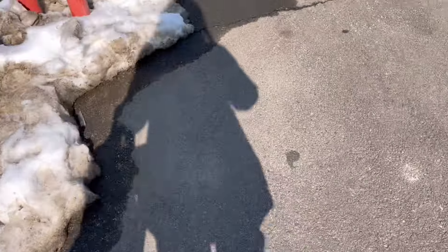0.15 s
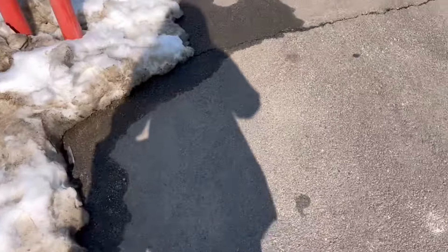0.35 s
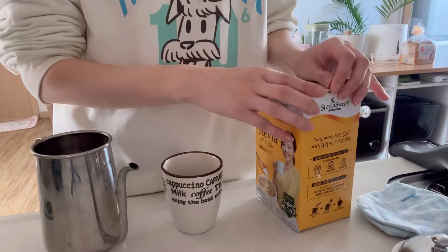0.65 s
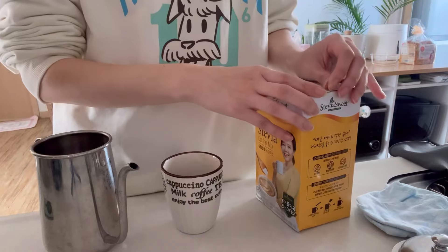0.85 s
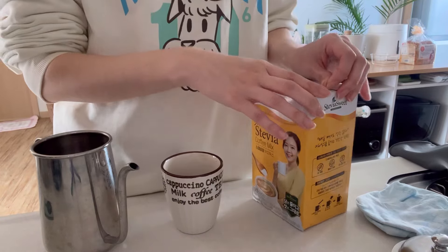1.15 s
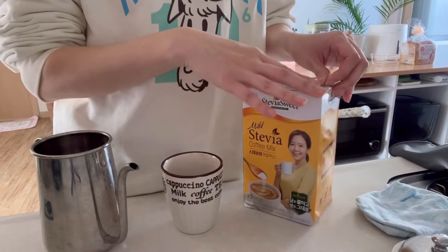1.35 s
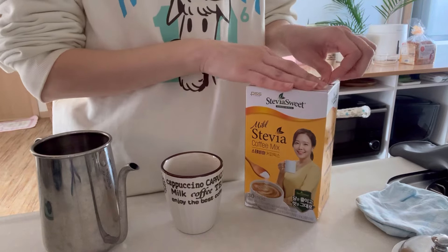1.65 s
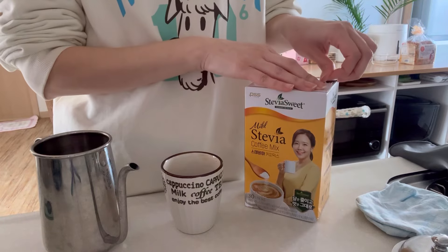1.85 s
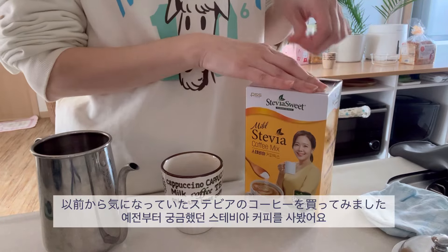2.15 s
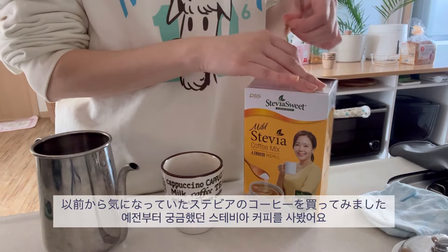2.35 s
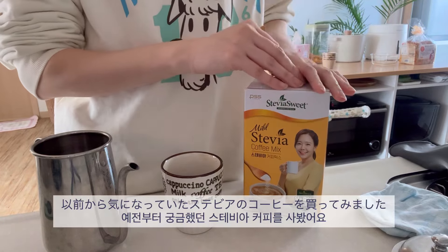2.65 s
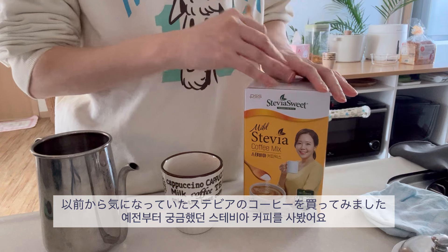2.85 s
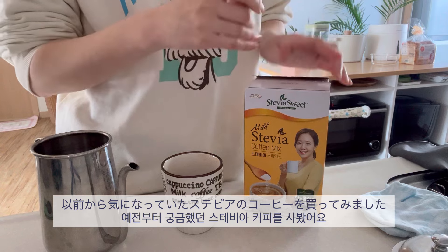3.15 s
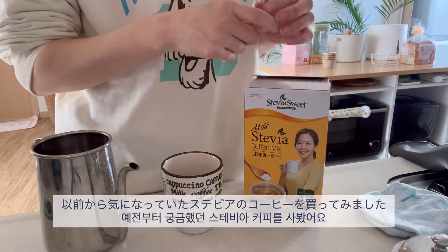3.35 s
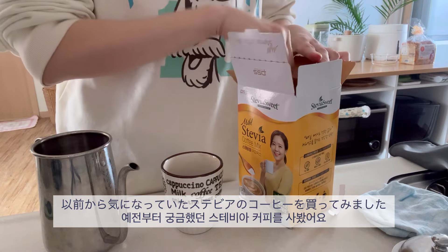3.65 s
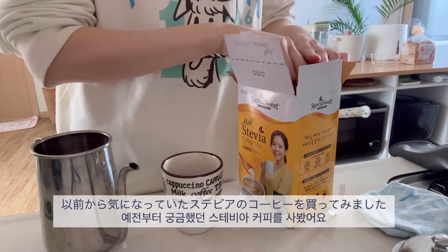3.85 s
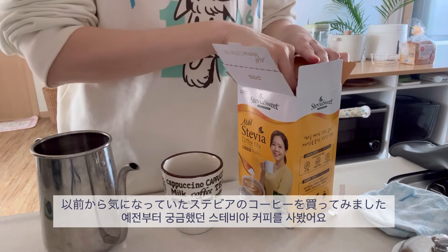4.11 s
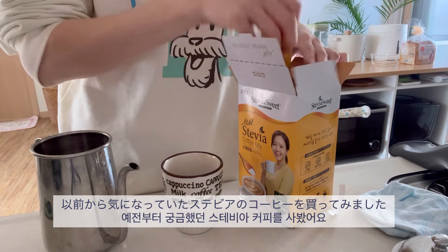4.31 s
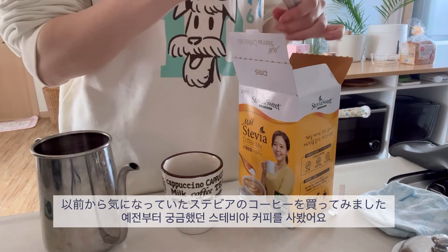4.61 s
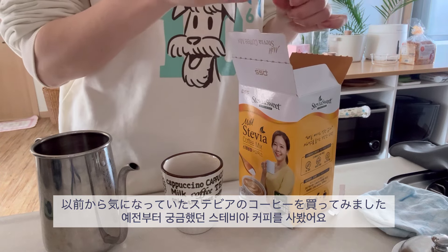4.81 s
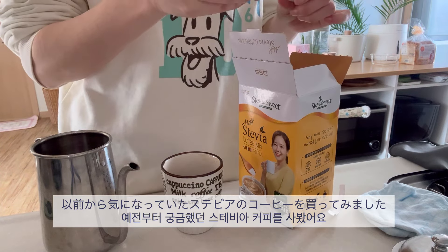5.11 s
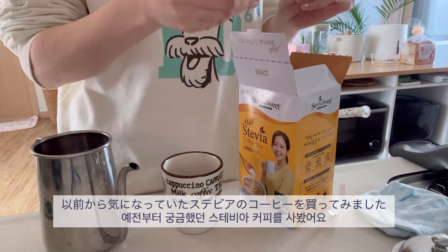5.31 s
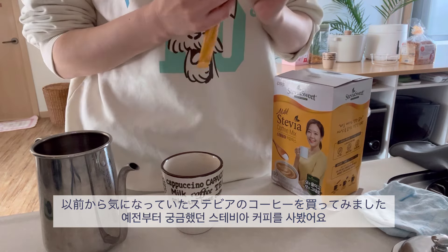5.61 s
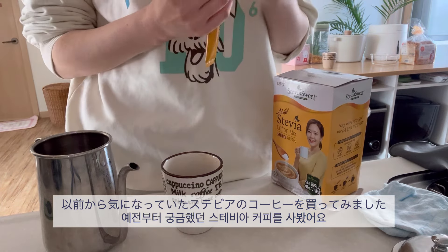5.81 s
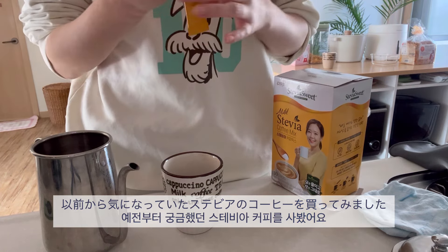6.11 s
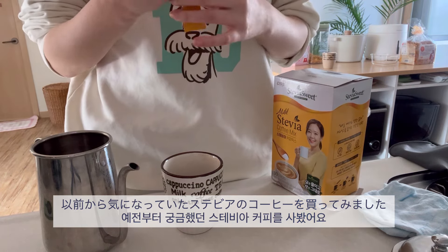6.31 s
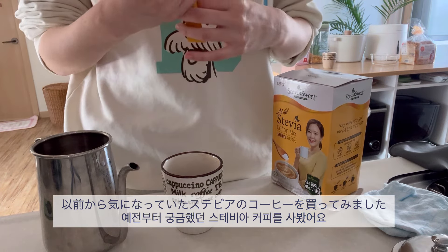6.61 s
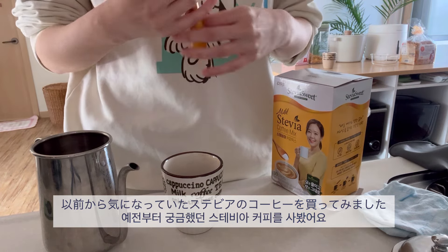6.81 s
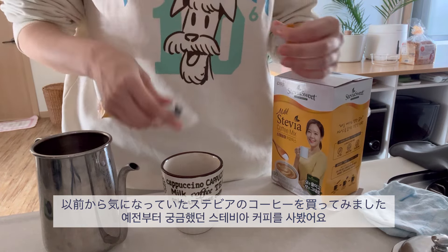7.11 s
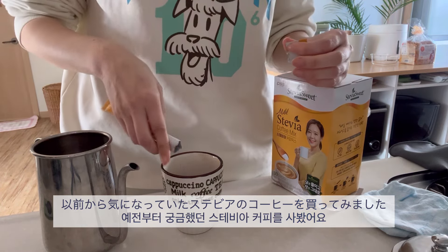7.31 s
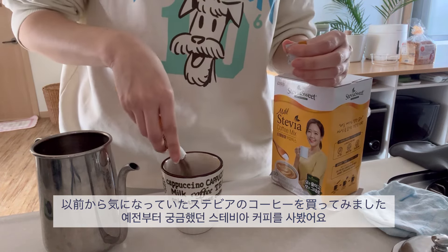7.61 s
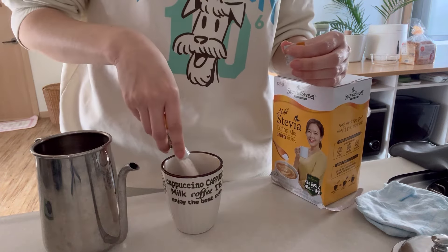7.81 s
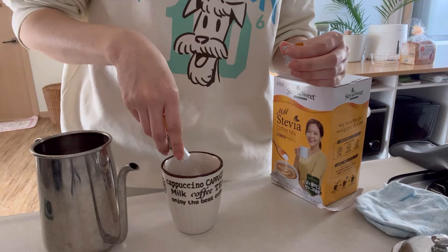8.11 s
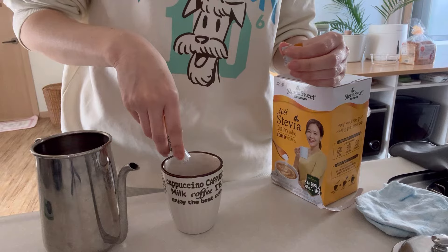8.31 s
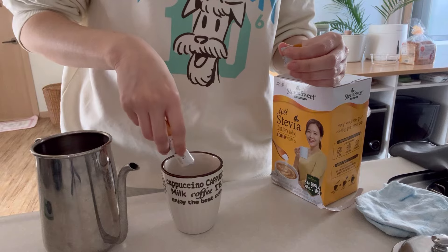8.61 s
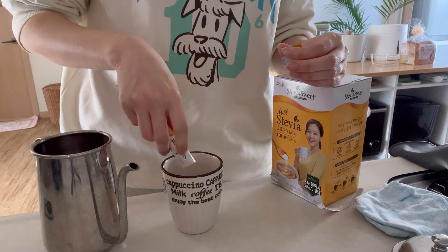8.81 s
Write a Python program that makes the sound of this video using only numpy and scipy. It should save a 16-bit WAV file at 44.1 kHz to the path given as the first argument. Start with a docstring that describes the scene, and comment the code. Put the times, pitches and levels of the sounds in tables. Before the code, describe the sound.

Half a second of low outdoor wind and far traffic cuts abruptly to a small kitchen with faint appliance hum. Close to a stereo microphone, fingers rub a cardboard box, rip its perforation in a rapid run of bright cracks and hollow knocks, then pop the lid loudly. Softer rustling follows, a foil sachet clicks and crackles, and powder pours into a mug with a swelling hiss.

```python
"""Hands pick at a cardboard box and rip its perforated lid open: bright cracks, ringing walls, thuds, rustle.
A foil sachet then clicks and crackles, and its powder pours into a mug as a growing grainy hiss.
An appliance hums and buzzes faintly behind; half a second of street air comes first.
Snaps and clicks are noise bursts through resonances; the rest is mostly shaped noise.
Two microphone ports hear it, their likeness and phase varying with frequency."""
import sys
import numpy as np
from scipy import signal
from scipy.fft import rfft, irfft, next_fast_len
from scipy.io import wavfile
from scipy.ndimage import uniform_filter1d, map_coordinates

SR = 44100
rng = np.random.default_rng(int(sys.argv[2]) if len(sys.argv) > 2 else 0)


def materialize(psi):
    """Save the field psi as 16-bit PCM at rate SR to the path in sys.argv[1].

    A 1-D psi becomes a single channel; in a 2-D psi each row is a channel.
    """
    bounded = np.clip(np.atleast_2d(psi).T, -1, 1)
    quanta = np.round(bounded * 32767).astype(np.int16)
    wavfile.write(sys.argv[1], SR, quanta)


N = 394949


def amp(db):
    """Gain of a level in dB."""
    return 10 ** (np.asarray(db) / 20)


def unit(x):
    """Scaled to rms 1."""
    return x / np.sqrt(np.mean(x ** 2) + 1e-20)


def peak(x):
    """Scaled to a peak of 1."""
    return x / np.abs(x).max()


def along(points, hz):
    """Interpolates (frequency [Hz], value) points on a log frequency axis."""
    f, v = np.transpose(points)
    return np.interp(np.log(hz + 1), np.log(f + 1), v)


def wobble(knots_per_s):
    """A smooth random curve through normal random knots."""
    knots = rng.standard_normal(int(N * knots_per_s / SR) + 4)
    return map_coordinates(knots, [np.arange(N) * knots_per_s / SR])


def filtered(x, response):
    """x times a complex response of frequency."""
    m = next_fast_len(x.shape[-1] + 8192)
    spectrum = rfft(x, m) * response(np.fft.rfftfreq(m, 1 / SR))
    return irfft(spectrum, m)[..., :x.shape[-1]]


def modes(table):
    """Causal response of (centre [Hz], width [Hz], level [dB]) resonances, summed with alternating sign."""
    def response(f):
        total = 0
        for k, (centre, width, db) in enumerate(table):
            damping = 1j * f * width
            total = total + (-1) ** k * amp(db) * damping / (centre * centre - f * f + damping)
        return total
    return response


def noise(spectrum, grain_db=0, grain_rate=1, patchy_db=0):
    """Two unrelated noises of one colour, rms 1, sharing a grainy envelope and patches of shifting colour."""
    grainy = amp(grain_db * wobble(grain_rate)) * rng.standard_normal((2, N))
    z = signal.stft(grainy, nperseg=256)[2]
    field = uniform_filter1d(rng.standard_normal(z.shape[1:]), size=6, axis=0)
    field = uniform_filter1d(field, size=12, axis=1)
    pair = signal.istft(z * amp(patchy_db * unit(field)), nperseg=256)[1][:, :N]
    return unit(filtered(pair, lambda hz: amp(along(spectrum, hz))))


def burst(t60, rise):
    """Two short, unrelated noise bursts; decay time t60 [s], rise constant [s]."""
    t = np.arange(SR // 8) / SR
    return amp(-60 * t / t60) * (1 - np.exp(-t / rise)) * rng.standard_normal((2, len(t)))


def stroke(start, length, first_db, last_db, attack, release, edge_db):
    """Gain of a gesture: ramps of edge_db per attack and release time [s] around a hold drifting in dB."""
    # each ramp runs three such times, so it starts or ends 3 * edge_db under the hold
    times = np.cumsum([start - 3 * attack, 3 * attack, abs(length), 3 * release])
    levels = [first_db - 3 * edge_db, first_db, last_db, last_db - 3 * edge_db]
    return amp(np.interp(np.arange(N) / SR, times, levels))


# room decay: (frequency [Hz], t60 [s])
ROOM_T60 = [(100, 0.27), (560, 0.49), (1500, 0.26), (5000, 0.26), (9000, 0.25), (15000, 0.021)]


def add(track, hit, s, wet_db):
    """Puts a hit at time s with its own 3 ms late room tail, each frequency dying at its own speed."""
    hz, t, z = signal.stft(rng.standard_normal((2, SR // 2)), SR, nperseg=256)
    decay = amp(-60 * t / along(ROOM_T60, hz)[:, None])
    tail = signal.istft(z * decay, SR, nperseg=256)[1]
    wet = signal.fftconvolve(hit, amp(wet_db) * tail / np.linalg.norm(tail[0]), axes=1)
    start = round(s * SR)
    track[:, start:start + hit.shape[1]] += hit
    track[:, start + 130:start + 130 + wet.shape[1]] += wet


# street colour: (frequency [Hz], relative level per Hz [dB])
STREET_COLOUR = [(15, -36), (25, -3), (64, -1.5), (495, -17.5), (631, -9.5), (826, -21), (1710, -28),
                 (4870, -44.5), (8350, -59), (11800, -58), (15500, -67)]
STREET_DB, STREET_SINKS_DB_PER_S = -37.5, 7.5


def street():
    """Wind and far traffic: sinking noise, strongest in the bass, lumpy in level."""
    level_db = STREET_DB - STREET_SINKS_DB_PER_S * np.arange(N) / SR
    return amp(level_db) * noise(STREET_COLOUR, 1.2, 60)


# appliance tones: (frequency [Hz], relative level [dB])
HUM_TONES = [(129, 0), (156, -7)]
# low rumble colour: (frequency [Hz], relative level per Hz [dB])
RUMBLE_COLOUR = [(15, -63.5), (35, -24.5), (55, -5), (72, -1.5), (92, -16.5), (110, -3.5), (160, -9),
                 (190, -18.5), (300, -32), (570, -120)]
# room murmur colour: (frequency [Hz], relative level per Hz [dB])
MURMUR_COLOUR = [(120, -45.5), (200, -18), (280, -3.5), (406, -8), (653, -6.5), (740, -2), (1200, -12),
                 (2500, -44.5), (3250, -67.5), (5500, -120)]
# panels the motor shakes, passed twice: (centre [Hz], width of one pass [Hz], level of one pass [dB])
BUZZ_PANELS = [(742, 110, -7), (3100, 600, 0)]
# stepped background: (start [s], rumble [dB], murmur [dB], buzz [dB])
BACKGROUND_STEPS = [(0, -60.5, -78, -94), (0.781, -55.5, -72, -81.5), (2.95, -57.5, -75.5, -92),
                    (3.451, -56.5, -62.5, -82), (4.599, -58, -66.5, -81.5), (5.431, -54, -63.5, -82),
                    (7.4, -55, -64, -105), (8.25, -55.5, -63, -80.5)]
HUM_ON_S, HUM_OFF_S, HUM_DB = 1.9, 5.43, -55.5
BUZZ_MEAN_HZ = 37


def kitchen():
    """A booming hum over rumble, the room's murmur and a motor tapping its panels at a slightly drifting rate."""
    t = np.arange(N) / SR
    starts, *levels = np.transpose(BACKGROUND_STEPS)
    step = np.clip(np.searchsorted(starts, t) - 1, 0, None)
    rumble_db, murmur_db, buzz_db = np.array(levels)[:, step]

    phase = np.cumsum(BUZZ_MEAN_HZ * (1 + 0.016 * wobble(1.4))) / SR % 1
    taps = np.exp(-((phase - .5) / 0.16) ** 2) * (1.2 + rng.standard_normal((2, N)))
    panels = unit(filtered(taps, lambda hz: modes(BUZZ_PANELS)(hz) ** 2))
    buzz = amp(2 * wobble(3)) * panels

    tones = [amp(db + 2.5 * wobble(5)) * np.sin(2 * np.pi * hz * t + 0.8 * wobble(4)) for hz, db in HUM_TONES]
    hum = amp(HUM_DB) * (t > HUM_ON_S) * (t < HUM_OFF_S) * unit(sum(tones))
    rumble = amp(rumble_db) * noise(RUMBLE_COLOUR)
    return hum + rumble + amp(murmur_db) * noise(MURMUR_COLOUR) + amp(buzz_db) * buzz


# powder colour: (frequency [Hz], relative level per Hz [dB])
POWDER_COLOUR = [(700, -22.5), (1500, -15), (2700, -2), (4300, -9.5), (5400, -5), (7200, -5), (9500, -3.5),
                 (12500, -7), (16000, -9)]
POUR_START_S, POUR_FULL_S, POUR_END_S = 7.155, 7.98, 8.06
POUR_DB, POUR_GROWS_DB_PER_S = -55.5, 16.5
POUR_ATTACK_S, POUR_RELEASE_S, POUR_EDGE_DB = .33, .14, 33


def powder():
    """Powder leaving the sachet: finely grained hiss that grows as the sachet tips, then holds and stops."""
    length = POUR_END_S - POUR_START_S
    last_db = POUR_DB + POUR_GROWS_DB_PER_S * length
    full_db = POUR_DB + POUR_GROWS_DB_PER_S * (POUR_FULL_S - POUR_START_S)
    flow = stroke(POUR_START_S, length, POUR_DB, last_db, POUR_ATTACK_S, POUR_RELEASE_S, POUR_EDGE_DB)
    flow = np.minimum(flow, amp(full_db))
    return flow * noise(POWDER_COLOUR, 2.5, 1200, patchy_db=2.2)


# foil flips: (time [s], click peak [dB], tap re click [dB], edge re click [dB], click centre [Hz])
FOIL_FLIPS = [(4.501, -19.5, -46.5, -6, 6240), (4.5453, -37, -3, -2.5, 2050), (4.6424, -47, 0, -22, 1870),
              (4.701, -18, -31, -5.5, 3600), (5.0021, -49.5, -23.5, -6.5, 3400),
              (5.468, -59.5, -12, 16.5, 3430), (5.6176, -41, -16, 3.5, 2310),
              (5.687, -45.5, -24.5, -1.5, 3000), (5.7138, -33.5, -28.5, 2, 2650),
              (6.2285, -38, 1.5, -21, 3050), (6.3064, -52, 12.5, -5.5, 2000),
              (6.519, -24.5, -5, -4.5, 2830), (6.5248, -28, -2, -6.5, 3530), (6.537, -16.5, -24, -13, 2344),
              (6.5926, -27, -5, -21, 2880), (6.6426, -10.5, -19.5, 1, 2673),
              (6.6941, -29.5, -29, -15, 4320), (6.885, -33, -22, -24.5, 1980),
              (7.1598, -35, -19, -29, 3200), (7.2259, -35.5, -22, -12, 4430),
              (7.3682, -37.5, 6, -15.5, 2530), (7.54, -25, 0, 3, 2040), (7.7419, -20, -10.5, 2, 3470),
              (8.602, -35.5, -1, -4.5, 2540), (8.8272, -36, 1, -1.5, 2650)]


def foil():
    """A crease flips: a broad click, a hollow tap near 950 Hz, as of a mug or table, and a bright edge."""
    track = np.zeros((2, N + SR))
    for s, click_db, tap_db, edge_db, hz in FOIL_FLIPS:
        flip = burst(0.011, 0.0009)
        click = filtered(flip, modes([(hz, 0.55 * hz, 0), (6500, 4000, -8)]))
        tap = filtered(flip, modes([(962, 330, 0)]))
        edge = filtered(flip, lambda f: modes([(10000, 5500, 0)])(f) ** 2)
        hit = peak(click) + amp(tap_db) * peak(tap) + amp(edge_db) * peak(edge)
        add(track, amp(click_db) * hit, s, wet_db=-8.5)
    return track[:, :N]


CRACKLES_PER_S, CRACKLE_SPREAD_DB = 250, 5


def crackle():
    """Sparse creases, each a few decaying cycles at its own pitch, its phase differing between channels."""
    draws = rng.random((int(CRACKLES_PER_S * N / SR), 4))
    when, pitch, size, other = draws.T[:, :, None]
    k = np.arange(SR // 200)
    cycles = 1500 * 7 ** pitch * k / SR
    grain = amp(-CRACKLE_SPREAD_DB * np.log(size + .04) - 6 * cycles)
    at = ((when * N).astype(int) + k).ravel()
    channels = []
    for turn in (0, other):
        wave = grain * np.sin(2 * np.pi * (cycles + turn))
        channels.append(np.bincount(at, wave.ravel(), minlength=N)[:N])
    return unit(np.array(channels))


# rustle colour: (frequency [Hz], relative level per Hz [dB])
RUSTLE_COLOUR = [(600, -45), (1500, -14.5), (3000, -4), (6000, -6.5), (9000, -1.5), (12500, -9.5),
                 (16000, -17)]
# dragged surface, passed twice: (centre [Hz], width of one pass [Hz], level of one pass [dB])
SCRAPE_MODES = [(2700, 2500, 0)]
# box resonances, lowest first: (centre [Hz], width [Hz], level [dB])
BOX_MODES = [(119.5, 48, 7.5), (307, 23, -10.5), (406, 44, -1), (470, 44, -0.5), (557, 24, 5),
             (605.5, 16, 3.5), (757, 80, 0), (1036, 220, -6.5), (1520, 180, -8.5), (1923, 81, -15)]
# rubs and crumples: (start [s], length [s], first rustle level [dB], last level [dB], scrape re rustle [dB])
HAND_STROKES = [(1.094, 0.1, -79, -78, 0.5), (1.22, 0.2, -67.5, -69, -1.5), (1.571, 0.052, -70.5, -64, 1),
                (1.727, 0.038, -71.5, -65.5, -20), (1.864, 0.39, -55.5, -42.5, -3.5),
                (2.343, 0.19, -55, -59.5, -8), (2.582, 0.12, -57, -52.5, -3.5),
                (2.774, 0.36, -55.5, -62, -9), (3.628, 0.11, -58.5, -51.5, 0),
                (3.917, 0.12, -54.5, -59, -7.5), (4.065, 0.12, -64, -62, -2), (4.185, 0.25, -61, -46, -4),
                (4.501, 0.19, -54.5, -77, 1), (5.131, 0.312, -74, -65.5, -19.5),
                (5.472, 0.1, -74, -71, -20), (5.609, 0.11, -55.5, -60.5, -9.5),
                (5.838, 0.077, -68, -71, -17), (6.186, 0.2, -64.5, -66, -13), (6.635, 0.25, -56, -51, -11),
                (8.548, 0.093, -82, -63, -4.5)]
STROKE_ATTACK_S, STROKE_RELEASE_S, STROKE_EDGE_DB = 0.018, 0.092, 29
STILL_DB = -80.5  # faint steady hiss between strokes
DRUM_SHUT_DB, DRUM_OPEN_DB = 5, -0.5  # box walls re rustle gain, lid shut and open
DRUM_LUMPS_DB, CRACKLE_DB = 4.5, -9
LID_OPEN_S, LET_GO_S = 3.45, 4.46


def hands():
    """Rubbing and crumpling: grainy noise and creases in the air; while the box is held, its walls drum along."""
    t = np.arange(N) / SR
    gains = [stroke(*row[:-1], STROKE_ATTACK_S, STROKE_RELEASE_S, STROKE_EDGE_DB) for row in HAND_STROKES]
    motion = amp(STILL_DB) + sum(gains)
    drag = sum(amp(row[-1]) * gain for row, gain in zip(HAND_STROKES, gains))

    holding = amp(np.where(t < LID_OPEN_S, DRUM_SHUT_DB, DRUM_OPEN_DB)) * (t < LET_GO_S)
    lumps = amp(DRUM_LUMPS_DB * wobble(70)) * rng.standard_normal((2, N))
    drum = unit(filtered(lumps, modes(BOX_MODES)))

    rub = amp(1.2 * wobble(45)) * noise(RUSTLE_COLOUR, 2, 300, patchy_db=2.7)
    rustle = unit(rub + amp(CRACKLE_DB) * crackle())
    rough = amp(3.5 * wobble(60)) * rng.standard_normal((2, N))
    scrape = unit(filtered(rough, lambda hz: modes(SCRAPE_MODES)(hz) ** 2))
    return motion * (rustle + holding * drum) + drag * scrape


def thud():
    """A one-sided push into the lowest mode of the box."""
    push = np.abs(burst(0.037, 0.0032))
    return peak(filtered(push, lambda f: modes(BOX_MODES[:1])(f) ** 2))


# card fibres snap: (time [s], snap peak [dB], knock peak [dB], snap centre [Hz])
CARD_SNAPS = [(0.8106, -42, -55, 3770), (0.852, -24, -31.5, 2340), (1.8618, -20.5, -29.5, 4030),
              (1.912, -22, -17.5, 1820), (1.9687, -23.5, -23, 5270), (1.999, -22, -22, 4460),
              (2.0284, -22, -28.5, 4900), (2.061, -27, -22, 5200), (2.086, -16.5, -32, 5500),
              (2.108, -21, -17.5, 4840), (2.128, -14.5, -22.5, 3860), (2.1546, -23.5, -18, 5300),
              (2.175, -17, -24, 6500), (2.194, -23.5, -15.5, 1630), (2.2146, -16, -30, 3730),
              (2.234, -32, -25, 1670), (2.2534, -25, -32.5, 5700), (2.3377, -35.5, -30, 4120),
              (2.413, -38.5, -31.5, 4050), (2.582, -38.5, -64, 4150), (2.609, -29, -31.5, 4230),
              (2.6767, -22.5, -28.5, 3840), (2.746, -33.5, -56, 4400), (2.811, -18, -29.5, 2270),
              (2.825, -25.5, -21.5, 1930), (2.8659, -12.5, -15.5, 1900), (2.877, -9, -12, 1870),
              (2.8838, -5, -9.5, 3490), (3.451, -51, -70, 2960), (3.5288, -45.5, -55, 4040),
              (3.6283, -37.5, -47, 3970), (3.7006, -41.5, -47, 2960), (3.9052, -43.5, -61, 2600),
              (3.921, -38, -43.5, 5100), (3.9749, -44.5, -43, 1320), (4.009, -42, -59, 5230),
              (4.0518, -49, -60, 6000), (4.0716, -37.5, -37, 5270), (4.1679, -36, -37, 2240),
              (4.2964, -43, -46, 1500), (4.354, -27, -31, 2540), (4.3606, -25.5, -27.5, 4400),
              (4.372, -24, -31, 6300), (4.433, -40, -43, 5800)]
# a palm bumps the box without a snap: (time [s], thud peak [dB])
PALM_BUMPS = [(1.724, -33.5), (2.452, -34.5)]
# box rings higher once the lid is open: (time [s], pitch ratio [1])
WALL_PITCH = [(3.5, 1.0), (3.9, 1.5)]
THUD_DB, MIDDLING_KNOCK_DB, THUD_DB_PER_KNOCK_DB = -33.5, -24.5, 0.93
THUD_OPEN_DB = -8  # added once the lid is open
MODE_SCATTER_DB = 2.5  # each knock lands on another spot of the walls
TREBLE_DB, TREBLE_DB_PER_OCTAVE = -8.5, 7  # top edge re snap centre, at 4 kHz
TREBLE_DB_PER_DB = 0.25  # snaps that barely knock carry more top edge


def card():
    """Each snap is a bright crack of its own colour, a knock in the box walls and a thud."""
    track = np.zeros((2, N + SR))
    for s, snap_db, knock_db, hz in CARD_SNAPS:
        treble_db = TREBLE_DB + TREBLE_DB_PER_OCTAVE * np.log2(hz / 4000)
        treble_db += TREBLE_DB_PER_DB * (snap_db - knock_db)
        colour = [(1500, 1000, -7), (hz, 0.4 * hz, 0), (10500, 4000, treble_db)]
        crack = filtered(burst(0.014, 0.0022), modes(colour))

        higher = np.interp(s, *np.transpose(WALL_PITCH))
        # the wall jerks 2 ms after the fibres part
        jerk = np.roll(np.abs(burst(0.0029, 0.00083)), round(0.002 * SR), axis=1)
        jerk = jerk * [[1], [0.21 * rng.choice([-1, 1])]]
        walls = [(c, w, db + MODE_SCATTER_DB * rng.standard_normal()) for c, w, db in BOX_MODES[1:]]
        knock = filtered(jerk, lambda f: modes(walls)(f / higher))

        thud_db = THUD_DB + THUD_DB_PER_KNOCK_DB * (knock_db - MIDDLING_KNOCK_DB)
        thud_db += THUD_OPEN_DB * (s > LID_OPEN_S)
        hit = amp(snap_db) * peak(crack) + amp(knock_db) * peak(knock) + amp(thud_db) * thud()
        add(track, hit, s, wet_db=-8.0)
    for s, thud_db in PALM_BUMPS:
        add(track, amp(thud_db) * thud(), s, wet_db=-22)
    return track[:, :N]


def ports(pair, table):
    """Mixes two unrelated versions of a sound to the likeness and phase lead of the two ports."""
    f, alike, lead = np.transpose(table)

    def shares(hz):
        turn = np.arccos(np.clip(np.interp(hz, f, alike), -1, 1)) / 2
        return np.array([np.cos(turn), np.sin(turn)])

    def half_lead(hz):
        return np.exp(.5j * np.interp(hz, f, lead) * [[-1], [1]])

    mid, side = filtered(pair, shares)
    return filtered(np.array([mid + side, mid - side]), half_lead)


# ports indoors: (frequency [Hz], left-right likeness [1], right port's lead [rad])
KITCHEN_PORTS = [(0, .97, 0), (300, .5, .2), (440, .8, .2), (580, .65, 2.7), (780, .55, .3),
                 (1100, .5, 1.7), (1750, .65, 1.2), (3300, .45, 2.7), (4400, .3, 5), (5600, .3, 5.8),
                 (6750, .78, 4.75), (7600, .9, 4.3), (8100, .995, 3.3), (8600, .995, 3), (9100, .95, 2),
                 (10900, .95, 0), (13100, .995, -3), (13900, .995, -3.3), (16100, .95, -6.28)]
# ports outdoors: (frequency [Hz], left-right likeness [1], right port's lead [rad])
OUTDOOR_PORTS = [(0, 0.95, 0.5), (390, 0.91, 0.87), (650, 0.47, 2.7), (1710, 0.82, 6.8), (4240, 0.1, 11),
                 (9300, .97, 12.3), (12700, .95, 8.7)]
CUT_S = .503
FADE_S, FADE_DB_PER_S = 8.83, 157


def scene():
    """The street gives way to the kitchen at once; the kitchen fades out at the end."""
    t = np.arange(N) / SR
    indoors = kitchen() + hands() + card() + foil() + powder()
    fade = amp(-FADE_DB_PER_S * np.clip(t - FADE_S, 0, None))
    outside = (t < CUT_S) * ports(street(), OUTDOOR_PORTS)
    return outside + (t >= CUT_S) * fade * ports(indoors, KITCHEN_PORTS)


# left port's gain, right port's loss: (frequency [Hz], level [dB])
PORT_LEAN = [(40, 1), (150, -1.5), (600, -0.36), (3000, -0.5), (9000, 0.5)]
LOW_HZ, TOP_HZ = 33, 15900


def record(dry):
    """The ports differ a little in level; the bass rolls off below LOW_HZ, nothing passes from TOP_HZ up."""
    def response(hz):
        lean = amp(along(PORT_LEAN, hz) * [[1], [-1]])
        return lean * (hz < TOP_HZ) / (1 + (LOW_HZ / (hz + 1)) ** 4)
    return filtered(dry, response)


dry = scene()
out = record(dry)
materialize(out)
```